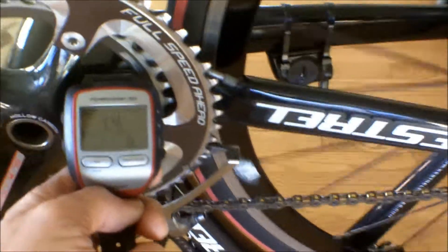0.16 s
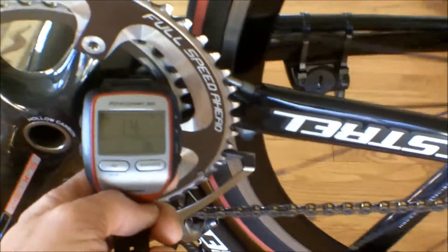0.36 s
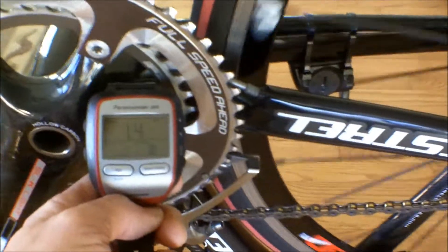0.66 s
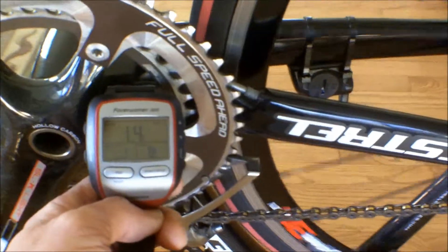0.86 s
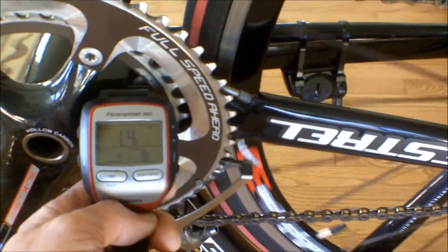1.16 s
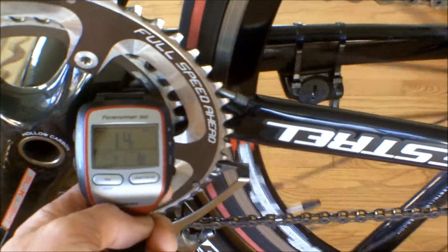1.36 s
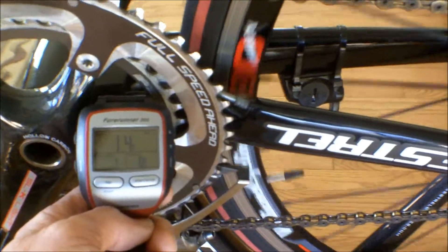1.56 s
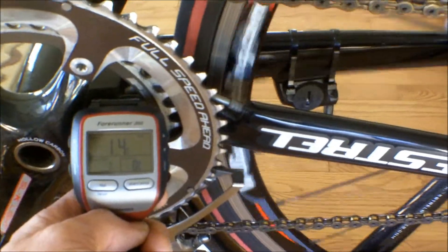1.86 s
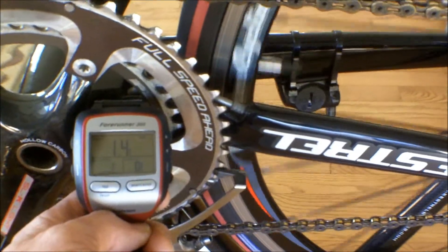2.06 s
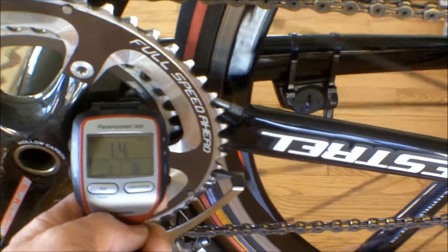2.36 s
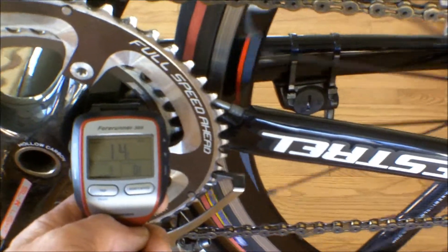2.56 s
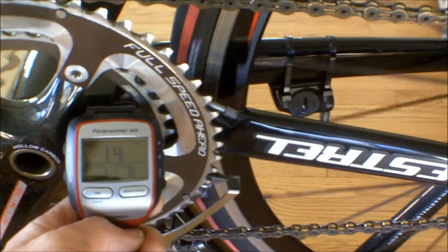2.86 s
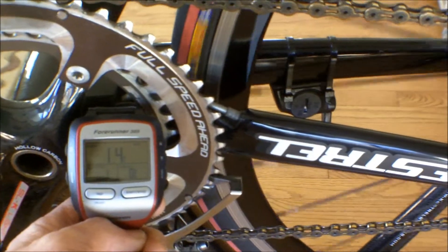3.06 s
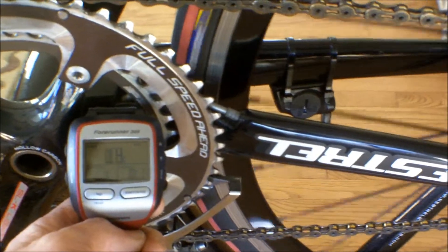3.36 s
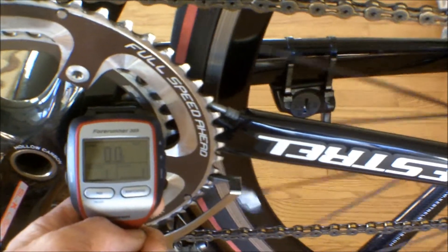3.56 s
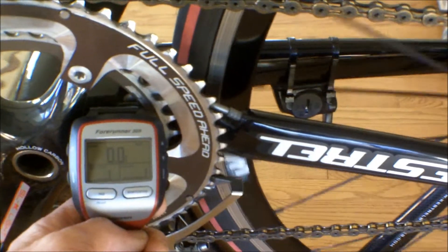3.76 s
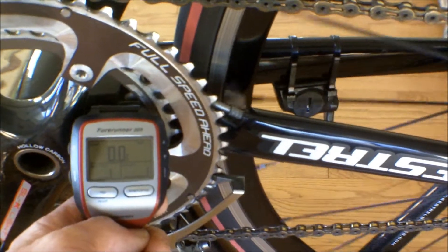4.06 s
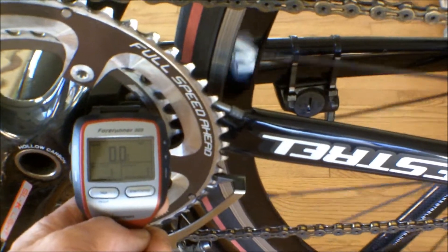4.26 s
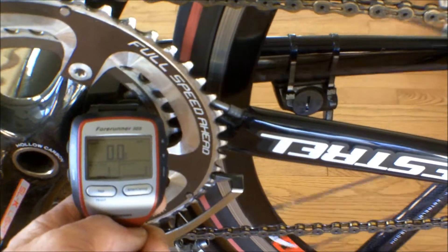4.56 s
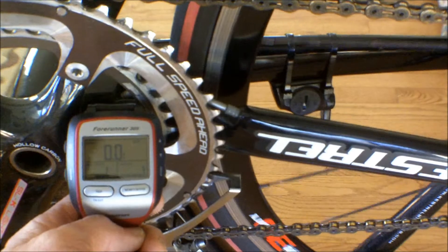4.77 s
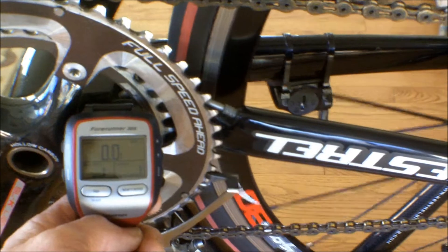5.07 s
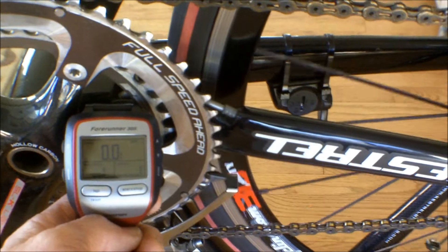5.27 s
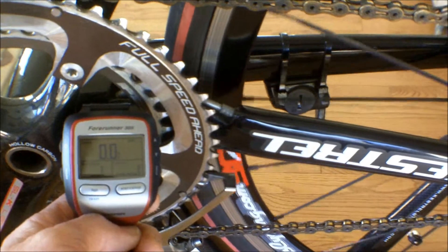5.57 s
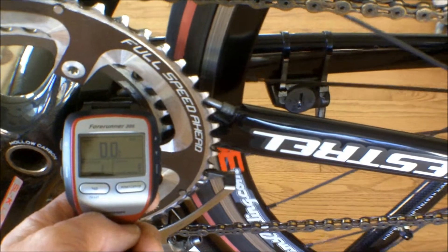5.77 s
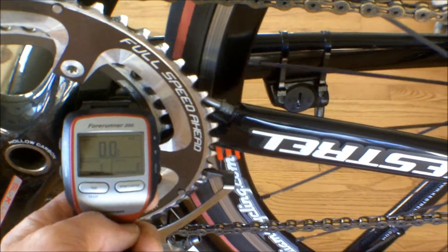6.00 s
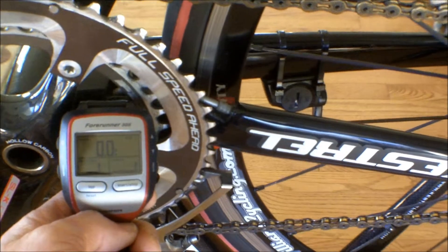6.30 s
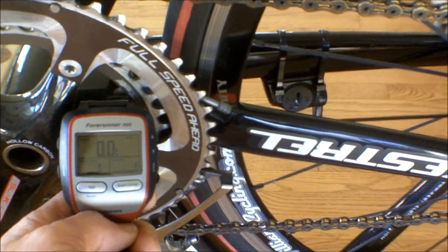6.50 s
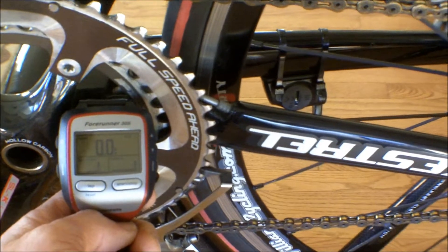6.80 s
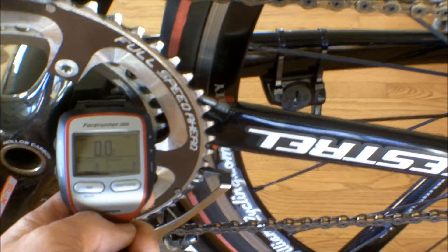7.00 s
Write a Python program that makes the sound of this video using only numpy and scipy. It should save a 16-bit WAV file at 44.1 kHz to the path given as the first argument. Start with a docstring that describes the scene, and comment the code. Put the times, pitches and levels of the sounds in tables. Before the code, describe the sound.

A bicycle's rear wheel coasts down in a small room, heard very close. From 0 s its freehub makes crisp, bright metallic clicks, about six per second, easing to roughly four by 2.5 s and three near 4.6 s. Each click is really three tiny steel snaps in quick succession, with a short ringing of hub, spokes and rim and a faint room tail. Around 5 s the gaps widen clearly; the final clicks fall near 5.0, 5.5 and 6.2 s, the last ones splitting into an audible stutter. Then only background remains. Soft, dull handling bumps with a hollow ring come near 0.1, 0.4, 0.8 and 1.5 s, and again at 7.1 s. Low rumble, strongest at the start, settles beneath slightly patchy, faint hiss. Nearly everything is on the left; the right is almost silent.

```python
"""Clusters of crisp metallic clicks, close by, drift further apart as a bicycle's rear wheel coasts down indoors.
At each ratchet tooth the freehub's three pawls snap one after another: shaped noise bursts, plus decaying
modes for the hub, spokes and rim. A small room answers with noise tails.
A hand bumps the camera a few times: soft pushes with a hollow ring of its case.
Behind lie rumble and hiss made of shaped noise; the right channel is nearly deaf."""
import sys
import numpy as np
from scipy import signal
from scipy.fft import rfft, irfft, next_fast_len
from scipy.io import wavfile
from scipy.ndimage import uniform_filter1d

SR = 44100
rng = np.random.default_rng(int(sys.argv[2]) if len(sys.argv) > 2 else 0)


def wav_record(signal):
    """Record a signal, one row per channel, as 16-bit PCM in the file named by sys.argv[1]."""
    frames = np.transpose(np.atleast_2d(signal))
    bounded = np.clip(frames, -1, 1)
    # unit amplitude maps onto the largest positive 16-bit level
    quanta = np.round(bounded * 32767).astype(np.int16)
    wavfile.write(sys.argv[1], SR, quanta)


N = 314874  # length [samples]

# ringing of hub, spokes and rim: (frequency [Hz], relative level [dB], t60 [s])
WHEEL_MODES = [(1028, -3, .18), (1076, -13, .08), (1135, -11, .1), (1211, -12, .1), (1308, -6, .12),
               (1394, -11, .1), (1485, -4, .11), (1507, -4, .11), (1625, 1, .12), (1655, -3, .1),
               (1733, -6, .1), (1959, -10, .1), (2051, -11, .09), (2244, -5, .1), (2417, -2, .11),
               (2578, -7, .09), (2723, -3, .11), (2783, -4, .08), (2875, 1, .09), (2906, 3.5, .09),
               (3003, 0, .09), (3190, -3, .06), (3579, 0, .09), (5286, -12, .05), (5458, -11, .05),
               (6126, -11, .05), (9318, 0, .035), (9959, -7, .03), (10524, -8, .03), (14594, -10, .04)]
# spectrum of a pawl's steel snap: (frequency [Hz], relative level [dB])
SNAP_SPECTRUM = [(100, -56.5), (600, -19.5), (1000, -5), (1600, -2), (1900, -4.5), (2400, 1.5), (3000, 2.5),
                 (3650, 2.5), (5400, -6.5), (7400, -12), (9600, -1.5), (12500, -5.5), (15000, -1),
                 (15500, -30)]
# decay of the snap: (frequency [Hz], t60 [s])
SNAP_T60 = [(1000, 0.091), (3000, 0.035), (6000, 0.052), (14000, 0.017)]
# the pawls' timing drifts because the ratchet runs slightly off centre:
# (tooth [count], second pawl's lag [teeth], third pawl's lag [teeth], first pawl's base level [dB])
PAWL_DRIFT = [(0, .015, .021, -43.5), (3.99, 0.019, 0.026, -42.5), (10.025, .025, 0.053, -42),
              (13.95, .029, .043, -41.5), (15.96, .031, .034, -40), (19.08, .036, .042, -43),
              (20.96, 0.035, .045, -41), (23.04, .037, .038, -42)]
SECOND_DB, THIRD_DB, PAWL_SPREAD_DB = -42.5, -42, 0.6  # base levels and their random spread [dB]

# the coasting wheel; its energy is counted as speed squared [(teeth/s)^2]
FIRST_CLICK_S, TEETH_PASSED, TEETH_PER_TURN = .0053, 24, 32
ENERGY, FRICTION_PER_TOOTH, FRICTION_GROWTH = 43.591, 1.7666, .0429
IMBALANCE, HEAVY_SIDE_DOWN_TOOTH = 9.017, 21.33

# decay of the room: (frequency [Hz], t60 [s])
ROOM_T60 = [(300, 1), (1500, 0.39), (3000, 0.28), (6000, 0.35), (14000, 0.18)]

# the hand bumps the camera: (time [s], push level [dB], push time constant [s], case ring level [dB])
BUMPS = [(0.062, -40, 0.02, -46.5), (0.368, -25.5, 0.0076, -45), (0.759, -38, 0.0026, -54),
         (1.501, -46, 0.0014, -58), (1.533, -36.5, .0012, -43), (7.084, -45, 0.0039, -61.5),
         (7.117, -31.5, 0.014, -55)]
CASE_HZ, CASE_T60_S = 341, 0.15

# room rumble and microphone hiss, before the hand's gain, the patchy thinning by the recorder's
# processing (left only) and the microphone's dip: (frequency [Hz], level [dB per Hz])
HUSH_LEFT = [(3, -47.5), (12, -50.5), (28, -63), (60, -80.5), (170, -86), (350, -91), (700, -96),
             (1500, -99), (2500, -104), (3600, -109), (5000, -113), (7500, -109), (12000, -109),
             (14900, -112), (15300, -140)]
HUSH_RIGHT = [(3, -85), (15, -81.5), (60, -92), (170, -94.5), (350, -102), (700, -109), (1500, -111),
              (2800, -115), (3700, -123), (5000, -120), (7500, -115), (12000, -114), (14900, -115),
              (15300, -145)]
# the hand starts unsteady and settles: extra rumble [dB], settling time [s], rumble at rest [dB]
SHAKE_DB, SETTLE_S, STEADY_DB = 6.5, 1.45, -0.64

NOTCH_HZ, NOTCH_WIDTH_HZ, NOTCH_DB = 4262, 314, -18.5  # a dip in the microphone's response
EDGE_HZ = 16100  # top of the band
# the converter's steady offset, one row for left and one for right: (offset [full scale])
OFFSET = [
    [.0549],
    [-.015],
]


def freehub(snap_db=24, ring_db=18, alike=0.39, phase_spread_rad=0.92, spread_s=0.00019, size=16384):
    """Each pawl has its own snap and its own grip on the wheel's modes; both vary from tooth to tooth."""
    t = np.arange(size) / SR
    hz, db, t60 = np.transpose(WHEEL_MODES)
    modes = gain_of(db)[:, None] * fade(t, t60[:, None]) * np.exp(2j * np.pi * hz[:, None] * t)
    modes /= np.linalg.norm(modes.real)
    grip = np.exp(2j * np.pi * rng.random((3, len(hz))))  # each pawl's starting phase in every mode
    own_snap = dying_noise(SNAP_T60, count=3, size=size)
    spreading = 1 - np.exp(-t / spread_s)  # the blow takes a moment to run out along the spokes
    snaps, ring = np.zeros((2, N))
    for drops in pawl_drops():
        chance_snap = dying_noise(SNAP_T60, count=3, size=size)
        for pawl, (at, level_db) in enumerate(drops):
            snap = np.sqrt(alike) * own_snap[pawl] + np.sqrt(1 - alike) * chance_snap[pawl]
            phase_jitter = phase_spread_rad * rng.standard_normal(len(hz))
            seat = grip[pawl] * np.exp(1j * phase_jitter)
            add(snaps, at, gain_of(level_db + snap_db) * spreading * snap)
            add(ring, at, gain_of(level_db + ring_db) * spreading * (seat @ modes).real)
    return colour(snaps, SNAP_SPECTRUM) + ring


def pawl_drops():
    """(time [s], base level [dB]) of three pawls per tooth; lags are angles, so they stretch as the wheel slows."""
    tooth = np.arange(TEETH_PASSED)
    gaps = 1 / wheel_speed(tooth + .5)
    start = FIRST_CLICK_S + np.cumsum(gaps) - gaps
    at, *columns = np.transpose(PAWL_DRIFT)
    second_lag, third_lag, first_db = (np.interp(tooth, at, column) for column in columns)
    speed = wheel_speed(tooth)
    times = np.transpose([start, start + second_lag / speed, start + third_lag / speed])
    levels = np.transpose(np.broadcast_arrays(first_db, SECOND_DB, THIRD_DB))
    levels = levels + PAWL_SPREAD_DB * rng.standard_normal(levels.shape)
    return np.stack([times, levels], axis=-1)


def wheel_speed(tooth, slowest=.82):
    """Teeth per second: friction drains the wheel's energy, its heavy side lends some on the way down."""
    lost = FRICTION_PER_TOOTH * tooth + FRICTION_GROWTH * tooth ** 2 / 2
    swing = IMBALANCE * np.cos(2 * np.pi * (tooth - HEAVY_SIDE_DOWN_TOOTH) / TEETH_PER_TURN)
    return np.sqrt(np.maximum(ENERGY - lost + swing, slowest ** 2))


def room(x, wet_db=-10.0, build_s=0.0028, turn_hz=0.454, count=3):
    """A small room: the turning wheel throws its clicks along paths that change at a steady rate."""
    t = np.arange(SR // 2) / SR
    build_up = 1 - np.exp(-t / build_s)
    tails = unit(dying_noise(ROOM_T60, count=count, size=len(t)) * build_up)
    path_phase = np.pi * np.arange(count)[:, None] / count
    facing = np.cos(2 * np.pi * turn_hz * np.arange(N) / SR + path_phase)
    sent = x * facing * np.sqrt(2 / count)  # the paths' total power stays constant
    wet = signal.fftconvolve(sent, tails, axes=1)[:, :N].sum(0)
    return x + gain_of(wet_db) * wet


def bumps():
    """A soft push on the camera that swings back, and a short hollow ring of its case."""
    t, out = np.arange(SR // 4) / SR, np.zeros(N)
    for at, push_db, push_s, ring_db in BUMPS:
        u = t / push_s
        push = np.e * u * (2 - u) * np.exp(-u)
        ring = np.sin(2 * np.pi * CASE_HZ * t) * fade(t, CASE_T60_S)
        add(out, at, gain_of(push_db) * push + gain_of(ring_db) * ring)
    return out


def hush(spectrum, rumble_hz=200):
    """Shaped noise: steady hiss over a rumble that calms as the hand settles."""
    hz = np.fft.rfftfreq(N, 1 / SR)
    z = rfft(rng.standard_normal(N)) * gain_of(read(spectrum, hz)) * np.sqrt(SR / 2)  # dB per Hz
    low_share = 1 / (1 + (hz / rumble_hz) ** 2)
    rumble = irfft(z * low_share, N)
    hiss = irfft(z * (1 - low_share), N)
    hand = gain_of(STEADY_DB + SHAKE_DB * np.exp(-np.arange(N) / SR / SETTLE_S))
    return hand * rumble + hiss


def thin_in_patches(x, patchy_db=4.0, centre_hz=560, width_hz=260):
    """The recorder's audio coding or noise suppression thins the hush around 560 Hz in small random patches."""
    hz, t, z = signal.stft(x, SR, nperseg=1024, noverlap=768)
    patches = uniform_filter1d(rng.standard_normal(z.shape), size=5, axis=0)
    patches = uniform_filter1d(patches, size=9, axis=1)
    depth_db = patchy_db / (1 + ((hz[:, None] - centre_hz) / width_hz) ** 2)
    processing = np.minimum(patches / patches.std(), 1)  # the recorder's processing cuts more than it boosts
    return signal.istft(z * gain_of(depth_db * processing), SR, nperseg=1024, noverlap=768)[1][:N]


def gain_of(db):
    """Decibels to amplitude."""
    return 10 ** (np.asarray(db) / 20)


def read(points, hz):
    """Reads a table on a log-frequency axis."""
    f, value = np.transpose(points)
    return np.interp(np.log(hz + 1), np.log(f + 1), value)


def unit(x):
    """Scales to an energy of one."""
    return x / np.linalg.norm(x, axis=-1, keepdims=True)


def fade(t, t60):
    """Exponential decay by 60 dB in t60 seconds."""
    return np.exp(-np.log(1000) * t / t60)


def add(mix, at, sound):
    """Mixes a sound in at the given time in seconds."""
    part = mix[max(round(at * SR), 0):][:len(sound)]
    part += sound[:len(part)]


def colour(x, spectrum, size=4096):
    """Causal (minimum-phase) filter with the shape of the given spectrum, scaled to unit energy."""
    hz = abs(np.fft.fftfreq(size, 1 / SR))
    log_gain = np.log(gain_of(read(spectrum, hz)))
    response = np.exp(np.conj(signal.hilbert(log_gain)))
    taps = np.fft.ifft(response).real[:size // 2]
    return signal.oaconvolve(x, unit(taps))[:len(x)]


def dying_noise(t60s, count, size):
    """Rows of noise in which each frequency dies at its own speed."""
    hz, t, z = signal.stft(rng.standard_normal((count, size)), SR, nperseg=64)
    dying = z * fade(t, read(t60s, hz)[:, None])
    return unit(signal.istft(dying, SR, nperseg=64)[1][:, :size])


def scene(right_db=-25.5):
    """Wheel and bumps fill the left channel; a faint, inverted copy leaks into the right."""
    sound = room(freehub()) + bumps()
    left = sound + thin_in_patches(hush(HUSH_LEFT))
    right = -gain_of(right_db) * sound + hush(HUSH_RIGHT)
    return np.array([left, right])


def record(dry, size=4096):
    """The microphone's dip, the band limit and the converter's steady offset."""
    padded = np.pad(dry, ((0, 0), (size, size)), mode="reflect")  # keeps the slow rumble smooth at both ends
    length = next_fast_len(padded.shape[1])
    hz = np.fft.rfftfreq(length, 1 / SR)
    dip = gain_of(NOTCH_DB / (1 + ((hz - NOTCH_HZ) / NOTCH_WIDTH_HZ) ** 2))
    heard = irfft(rfft(padded, length) * dip, length)
    band_limit = signal.firwin(511, EDGE_HZ, window=("kaiser", 9), fs=SR)
    limited = signal.oaconvolve(heard, band_limit[None], "same")
    return limited[:, size:size + N] + OFFSET


dry = scene()
out = record(dry)
wav_record(out)
```